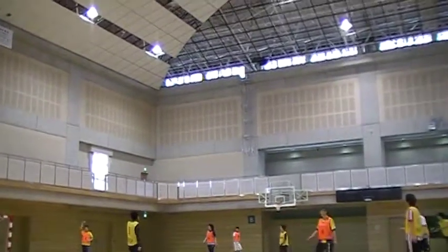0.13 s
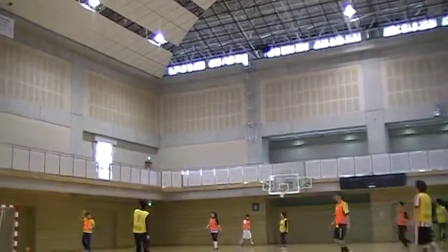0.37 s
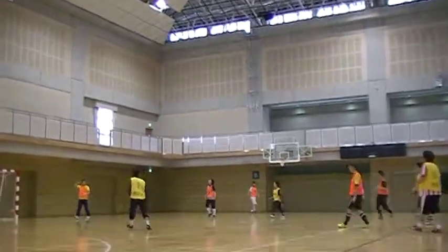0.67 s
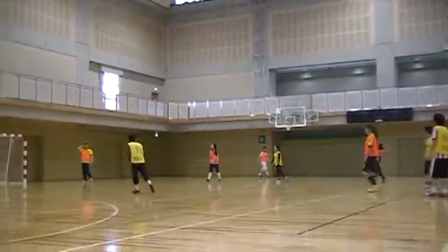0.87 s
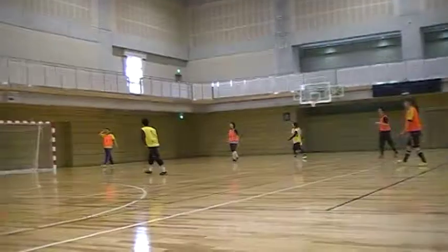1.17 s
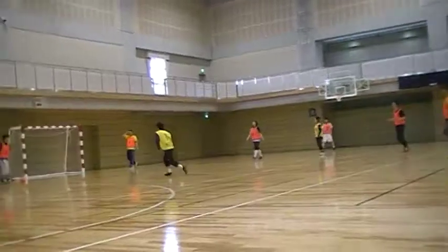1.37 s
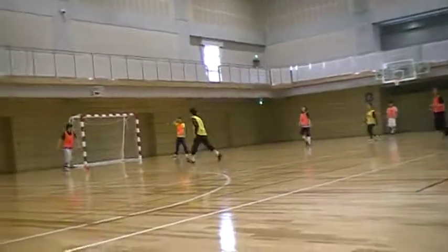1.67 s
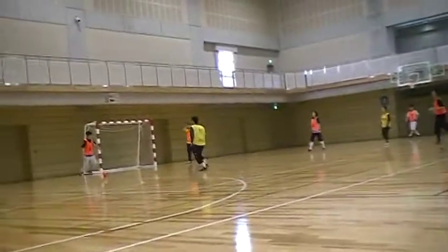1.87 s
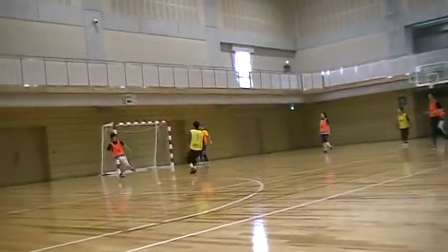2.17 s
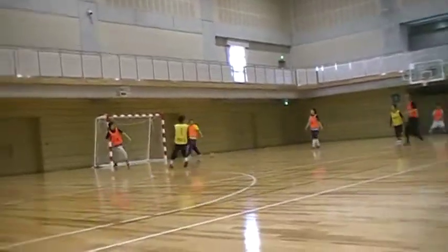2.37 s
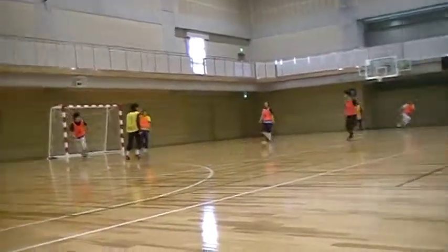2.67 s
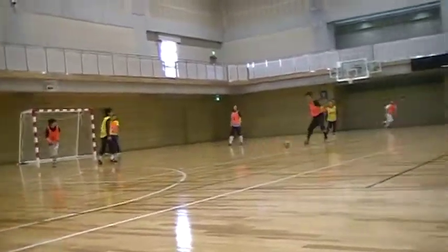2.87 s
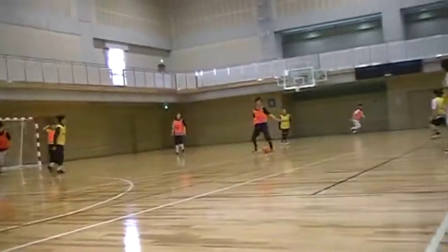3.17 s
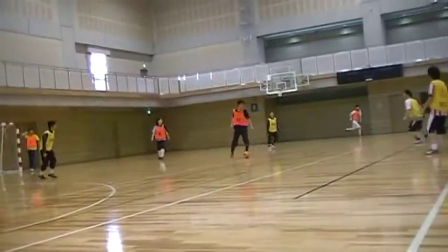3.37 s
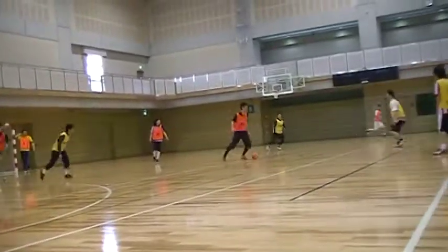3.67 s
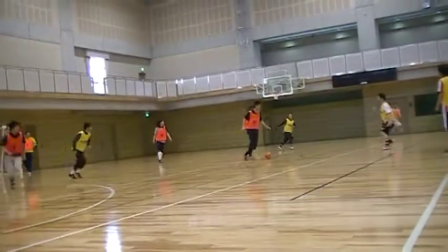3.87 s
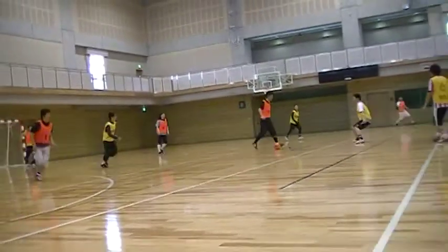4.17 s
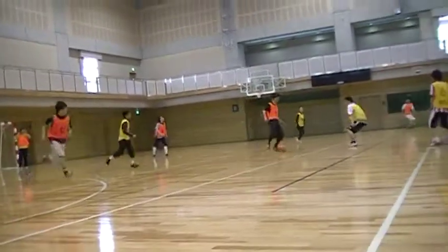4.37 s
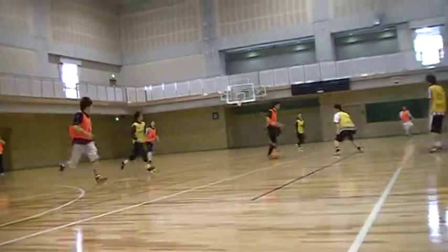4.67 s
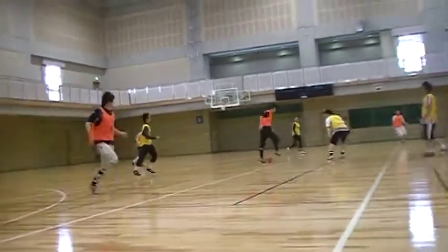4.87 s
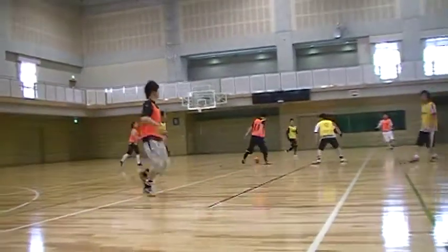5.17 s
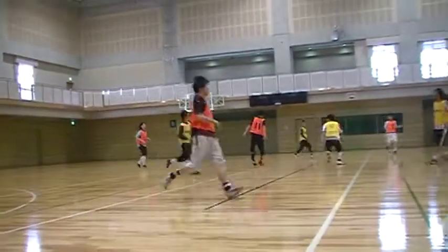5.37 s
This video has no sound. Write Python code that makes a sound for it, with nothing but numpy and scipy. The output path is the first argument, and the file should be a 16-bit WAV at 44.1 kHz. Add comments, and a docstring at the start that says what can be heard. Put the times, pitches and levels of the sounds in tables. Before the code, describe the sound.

Heard from the side line of a big, reverberant gym, an indoor football game makes irregular footfalls and ball knocks on wooden boards. Faint shoe chirps and hissing sole drags come and go over a steady wash of hall noise. After about four seconds the shoes squeal more loudly, and the loudest slaps and kicks land near the end as the background swells.

```python
"""Indoor football in a sports hall

Rubber soles squeal on a wooden floor in short chirps of stick-slip oscillation. Foot slaps and
ball kicks are impacts, and dragged soles hiss with sliding friction. Each sound reaches the side
line directly, then as long reverberation from far walls and roof, over a wash of distant noise."""
import sys
import numpy as np
from scipy import signal
from scipy.fft import rfft, irfft
from scipy.io import wavfile
from scipy.ndimage import uniform_filter1d

SR = 44100
rng = np.random.default_rng(int(sys.argv[2]) if len(sys.argv) > 2 else 0)


def dump(signal):
    """Clip the signal to [-1, 1] and save it as 16-bit WAV at the path in sys.argv[1]."""
    limited = np.clip(np.atleast_2d(signal).T, -1, 1)
    pcm = np.round(limited * 32767).astype(np.int16)
    wavfile.write(sys.argv[1], SR, pcm)


N = 242991


def undb(db):
    """Amplitude ratio of a level in decibels."""
    return 10 ** (np.asarray(db) / 20)


def shape(x, table, power=1):
    """Zero-phase filtering by a (frequency [Hz], gain [dB]) curve, its decibels scaled by power."""
    hz, db = np.transpose(table)
    bins = np.arange(x.shape[-1] // 2 + 1) * SR / x.shape[-1]
    gain = undb(power * np.interp(np.log(bins + 1), np.log(hz + 1), db))
    return irfft(rfft(x) * gain, x.shape[-1])


def band(x, lo_hz, hi_hz):
    """Band-pass filtering."""
    sos = signal.butter(2, [lo_hz, min(hi_hz, .45 * SR)], "bandpass", fs=SR, output="sos")
    return signal.sosfilt(sos, x)


def unit(x):
    """Normalisation to unit RMS."""
    return x / np.sqrt(np.mean(x ** 2))


def add(track, x, s):
    """Superposition of x on track from time s."""
    i = max(int(s * SR), 0)
    track[..., i:i + x.shape[-1]] += x[..., :N - i]


def rumble(level_db=-72):
    """Vibration of the building radiates a narrow band of low noise."""
    return undb(level_db) * unit(band(rng.standard_normal(N), 47, 79))


# Spectrum of the distant noise: (frequency [Hz], relative spectral density [dB])
WASH_SPECTRUM = [(15, -48), (25, -59), (87, -0.5), (223, -9.5), (317, 4), (384, 1.5), (714, 3), (2050, -3),
                 (3300, -12), (4500, -14), (7310, -12), (11900, -22), (16000, -67)]
# Its envelope: (time [s], level [dB])
WASH_ENVELOPE = [(0, -44.5), (.8, -47), (1.698, -51.5), (2.599, -47.5), (3.7, -43.5), (4.598, -42.5),
                 (5.51, -37.5)]
def wash():
    """Far feet and air handling sum incoherently to diffuse noise; rows are mid and side."""
    s, db = np.transpose(WASH_ENVELOPE)
    noise = shape(rng.standard_normal((2, N)), WASH_SPECTRUM)
    return noise / np.std(noise[0]) * undb(np.interp(np.arange(N) / SR, s, db))


def patter(steps_per_s=50):
    """Shot noise: small steps all over the court fall at random times with random strengths."""
    timing, strength, grain = rng.random((3, N))
    impulses = (timing < steps_per_s / SR) * undb(-40.5 - 1.03 * np.log(strength + 1e-9))
    burst = 4 * (grain[:200] - .5) * np.exp(-np.arange(200) / 50)
    return band(signal.fftconvolve(impulses, burst)[:N], 330, 5900)


# Decay of the hall by band: (frequency [Hz], reverberation time [s], relative level [dB])
HALL_BANDS = [(95, 2.1, 5.5), (248, 2.4, 5), (556, 1.8, 7), (1338, 2.12, 7.5), (2430, 2.4, 6),
              (4400, 2.22, 3.5), (8240, 1.68, 3.5), (12100, 0.21, -12), (14900, 0.19, -27)]
def hall(x, gain_db=-7, build_s=0.014):
    """Reverberation: wall echoes thicken and are absorbed, treble first; rows are mid and side."""
    t = np.arange(2 * SR) / SR
    arrives = rng.random(2 * SR) < np.clip((t / .35) ** 2, .005, 1)  # echo density grows as time squared
    echoes = rng.standard_normal((2, 2 * SR)) * arrives
    echoes /= np.sqrt(uniform_filter1d(echoes[0] ** 2, size=800) + 1e-9)
    log_hz = np.log(np.array(HALL_BANDS)[:, 0])
    log_bins = np.log(np.arange(SR + 1) / 2 + 1)
    # overlapping bands sum to unity, each with its own decay
    shares = [np.interp(log_bins, log_hz, row) for row in np.eye(len(log_hz))]
    response = sum(undb(db - 60 * t / t60) * irfft(rfft(echoes) * share)
                   for (_, t60, db), share in zip(HALL_BANDS, shares))
    response *= 1 - np.exp(-(t / build_s) ** 2)
    response *= undb(gain_db) / np.sqrt(np.sum(response[0] ** 2))
    return signal.fftconvolve(x[None], response, axes=1)[:, :N]


def early_reflections(x, gain_db=-9, t60_s=0.05):
    """Scattering by floor, near wall and players trails the direct sound; rows are mid and side."""
    t = np.arange(6000) / SR
    response = rng.standard_normal((2, 6000)) * undb(-60 * t / t60_s) * (t > .002)
    response *= undb(gain_db) / np.sqrt(np.sum(response[0] ** 2))
    return signal.fftconvolve(x[None], response, axes=1)[:, :N]


# Dragged soles:
# (centre time [s], half-length [ms], centre frequency [Hz], bandwidth [Hz], level at centre [dB])
SOLE_DRAGS = [(.38, 61, 1060, 1890, -36), (1.83, 77, 3830, 5540, -43.5), (2.287, 168, 6100, 3730, -40),
              (2.818, 10.5, 5960, 8800, -32), (3.252, 24, 8300, 3870, -42), (3.552, 260, 7700, 3190, -49.5),
              (4.0, 22, 890, 1240, -32.5), (4.021, 20.5, 7640, 7000, -31), (4.232, 130, 7330, 2420, -33.5),
              (4.235, 84, 7100, 10900, -31.5), (4.929, 8.1, 8000, 8350, -25.5), (4.96, 30, 9000, 7100, -33)]
def scuffs(direct, to_hall, hall_db=-1):
    """Sliding friction without grip makes a gritty hiss that swells and fades."""
    for s, half_ms, hz, width_hz, db in SOLE_DRAGS:
        n = int(2 * half_ms * SR / 1000)
        noise = rng.standard_normal(24000)[:n]
        grit = undb(rng.standard_normal(600).repeat(40)[:n])
        hiss = unit(band(noise * grit, max(hz - width_hz / 2, 100), hz + width_hz / 2))
        x = undb(db) * hiss * np.hanning(n) ** 2
        add(direct, x, s - half_ms / 1000)
        add(to_hall, undb(hall_db) * x, s - half_ms / 1000)


def knock(slap_db, thud_db, tick_db, contact_ms):
    """Impact excitation: the sole slaps, grit ticks, and the boards thud and boom on."""
    t = np.arange(2000) / SR
    contact_s = np.clip(contact_ms, .2, 15) / 1000
    noise = rng.standard_normal((2, 2000))
    contact = noise[0] * np.abs(noise[1]) * np.exp(-(t / contact_s) ** 2)
    contact[0] += 3.0  # initial impulse
    boards = contact + 0.48 * noise[1] * np.exp(-t / (5.7 * contact_s))
    # neighbouring bands alternate in sign so that they do not cancel where they meet
    slap = band(contact, 1340, 3090)
    tick = -band(contact, 3100, 11600)
    thud = -band(boards, 450, 1203)
    boom = band(band(boards, 114, 440), 114, 440)
    # energy scales with contact plus ring time: (signal, level re slap [dB], ring time [s])
    parts = (slap, 0, 0), (thud, thud_db, .0056), (tick, tick_db, .0071), (boom, thud_db - 11, .0096)
    return sum(undb(slap_db + db) * x * np.sqrt(0.29 * (contact_s + ring_s) * SR / np.sum(x ** 2))
               for x, db, ring_s in parts)


# Foot slaps, kicks and their first wall echoes:
# (time [s], slap level [dB], thud re slap [dB], tick re slap [dB])
IMPACTS = [(0.3203, -32.5, -1.5, 0.5), (0.3309, -31, 2, 3), (0.3948, -29.5, -1.5, -4),
           (0.5816, -32, -3.5, -12.5), (0.6471, -26.5, -13, -11), (0.8069, -26.5, -19, -12),
           (0.836, -34.5, -8, -13), (0.9607, -29, -11, -21), (1.0089, -32.5, -8, -12),
           (1.0305, -39.5, 0, -16), (1.1457, -33.5, -20, -4), (1.1631, -24, -8.5, -15.5),
           (1.178, -29.5, -7.5, -18), (1.1902, -34.5, 0, -20), (1.4798, -39.5, 1, -16),
           (1.798, -40.5, -2, 4), (1.8262, -30, -2.5, -15), (1.8932, -35, -13, -10.5),
           (2.145, -25.5, 4.5, 5), (2.1616, -30.5, 2.5, 2), (2.1791, -22.5, -2.5, -6),
           (2.1901, -30.5, -20, 1.5), (2.2648, -27, 0.5, -16), (2.268, -30, -6, -4), (2.3084, -38, -14, -5),
           (2.4932, -31.5, -1.5, -1), (2.6258, -29.5, -14.5, -7), (2.8641, -19.5, -3.5, -26),
           (2.877, -39, -21, 6), (2.891, -37, 3, 4.5), (2.923, -20, -10, -5), (3.0582, -33, -0.5, 1.5),
           (3.124, -30, -1.5, -8), (3.1549, -32.5, 3.5, -3.5), (3.484, -38, -10, 1), (3.541, -32, -12, -11),
           (3.5683, -30, -6.5, -20), (3.6539, -38, 2, -12), (3.854, -21.5, -9, -4), (3.905, -34, -2, -14),
           (3.977, -36.5, 9, -3), (4.0723, -31.5, -3, -7), (4.1135, -25, -5.5, -12),
           (4.14, -26.5, -21, -6.5), (4.4457, -33, -2.5, -24), (4.6405, -29, -0.5, -20),
           (4.722, -27, -3.5, -26), (4.742, -25.5, -2, -7), (4.7603, -25.5, -1.5, -6),
           (4.7645, -14.5, -10, -3), (4.8616, -25, -19, -8), (5.0422, -32.5, 7.5, -5),
           (5.0848, -28, 5, -25), (5.0975, -7.5, -8.5, -10.5), (5.1191, -31, 10, -7),
           (5.25, -22.5, -8, -18), (5.3988, -42.5, 12.5, -14), (5.4193, -11.5, -9, -9),
           (5.4202, -9.5, -11.5, -6.5), (5.445, -38, 9, -25), (5.4882, -31.5, 11, -12),
           (5.498, -32, 4, -26)]
def knocks(direct, to_hall, reference_db=-29.5):
    """Contact time shortens with force, and loud, near blows have a smaller reverberant share."""
    for s, slap_db, thud_db, tick_db in IMPACTS:
        force_db = slap_db - reference_db
        x = knock(slap_db, thud_db, tick_db, contact_ms=1.82 - 0.05 * force_db)
        add(direct, x, s)
        add(to_hall, undb(3 - 0.38 * force_db) * x, s)


def squeak(ms, start_hz, end_hz, roughness):
    """Stick-slip oscillation: the sole slips once a cycle; roughness adds waver and harmonics."""
    n = int(ms * SR / 1000)
    progress = np.arange(n) / n
    waver = np.sqrt(30) * uniform_filter1d(rng.standard_normal((2, 2000)), size=30)[:, :n]
    glide_hz = start_hz + (end_hz - start_hz) * progress
    phase = 2 * np.pi * np.cumsum(glide_hz * (1 + 0.045 * roughness * waver[0])) / SR
    octaves_up = max(np.log2((start_hz + end_hz) / 2 / 3700), 0)
    overtone_db = -23 + 30.5 * roughness - 20 * octaves_up  # high squeaks are purer
    tone = np.sin(phase)
    for k in range(2, int(16000 / start_hz) + 1):
        tone += undb(overtone_db - 10 * (k - 2)) * np.sin(k * phase)
    grip = np.minimum(progress / .25, 1) * np.minimum((1 - progress) / .3, 1)
    return np.sqrt(2) * tone * grip * undb(2 * roughness * waver[1])


# Squealing soles and their clearest wall echoes: (time [s], duration [ms], start frequency [Hz],
# end frequency [Hz], level [dB], roughness [clipped to 0-1], gain into the hall [dB])
SOLE_SQUEAKS = [(.019, 6.8, 6400, 5370, -35, 0.15, 11.5), (.062, 5, 6500, 5760, -31.5, 0.68, 7.5),
                (.076, 25, 6240, 5960, -33, 0.65, -10), (.092, 8.1, 6110, 5800, -36, 0.15, 2),
                (.241, 3.2, 2650, 2280, -32.5, 0.25, 5), (.260, 9.5, 1588, 1570, -42.5, 0.72, 2),
                (.311, 5.3, 6170, 5730, -25, 0.48, 4), (.371, 6.5, 3880, 3400, -31, 0.47, -16),
                (.385, 3, 6040, 5870, -29.5, 0.3, -20), (.387, 2.8, 3790, 3340, -30, 0.65, 5),
                (1.143, 7.5, 7440, 7140, -29.5, 0.25, 6), (1.158, 6, 5250, 5180, -38, .3, 12.5),
                (1.189, 19, 7360, 7100, -36.5, 0.4, -2), (1.199, 28, 5120, 5160, -39, 0.3, -12),
                (1.226, 37, 7260, 7200, -38, 0, -17), (1.775, 6.3, 6260, 5530, -46.5, .5, 12),
                (2.088, 3.9, 8300, 8000, -41, 1.1, -6), (2.814, 6.6, 1710, 1970, -33, 0.64, 8),
                (2.850, 32, 3255, 3720, -46, 0.9, 2), (2.900, 34, 3750, 3400, -41, 0.56, -1),
                (2.943, 4.3, 3330, 3150, -30, 0.1, 7.5), (3.004, 7.6, 3570, 3410, -31, 0.27, 6),
                (3.05, 25, 4670, 4840, -47.5, 0.1, 11.5), (3.082, 24, 3520, 3345, -37, 0.35, 4),
                (4.015, 10.2, 4230, 3405, -19, 0.62, -3.5), (4.025, 7.8, 3710, 3060, -24, 0.66, -1),
                (4.548, 23.4, 3444, 3716, -16, 0.12, -6.5), (4.568, 7.1, 3714, 3700, -26, 0.61, 4),
                (4.582, 7, 4940, 4430, -32.5, 0.7, -17), (4.594, 8.9, 7800, 7400, -32, .2, -15),
                (4.602, 3.7, 4140, 4000, -34, 1.1, -10), (4.625, 10, 3680, 3600, -28.5, 0, 3),
                (4.635, 13, 3500, 3824, -22, 0.13, 7.5), (4.654, 4.8, 3970, 4000, -23, 0, -1),
                (4.918, 7.6, 7920, 5720, -25.5, 0.44, 3), (4.925, 8.6, 5200, 6100, -27.5, 0.3, -5),
                (4.933, 23.5, 3520, 3438, -20, 0.27, -0.5), (4.955, 11, 3520, 3620, -23.5, 0.42, 5),
                (4.958, 14, 6070, 5400, -33.5, 0.4, 3)]
def squeaks(direct, to_hall):
    """Uneven radiation towards the walls modulates a rough squeal and so widens its tail's spectrum."""
    uneven = unit(uniform_filter1d(rng.standard_normal(N), size=60))
    for s, ms, start_hz, end_hz, db, roughness, hall_db in SOLE_SQUEAKS:
        roughness = np.clip(roughness, 0, 1)
        x = undb(db) * squeak(ms, start_hz, end_hz, roughness)
        modulation = 1 + 1.72 * roughness * uneven[int(s * SR):][:len(x)]
        add(direct, x, s)
        add(to_hall, undb(hall_db) * x * modulation, s)


# Width of the diffuse field: (frequency [Hz], side re mid [dB])
DIFFUSE_WIDTH = [(50, -11), (500, -13.5), (2000, -9.5), (6000, -8.5), (9500, -3.5), (15000, -23)]
def scene():
    """Direct sound in the centre and the diffuse field superpose; rows are left and right."""
    direct, to_hall = np.zeros((2, N))
    squeaks(direct, to_hall)
    knocks(direct, to_hall)
    scuffs(direct, to_hall)
    steps = patter()
    mid, side = hall(to_hall + steps) + early_reflections(direct + steps) + wash()
    side = shape(side, DIFFUSE_WIDTH)
    return direct + steps + np.array([mid + side, mid - side]) + rumble()


# Balance of the microphone ports: (frequency [Hz], left re right [dB])
PORT_BALANCE = [(60, 4.5), (110, 5.5), (200, 3), (380, 4), (700, 1), (1290, 1.5), (2380, 1.0), (4400, 0.5),
                (8120, 0.5), (15000, 1)]
# Phase between the ports: (frequency [Hz], lead of the left [rad])
PORT_PHASE = [(0, 0), (260, -.2), (1500, 0), (7000, .2), (9300, 1.3), (16000, .8)]
def record(dry, rolloff_hz=8200, cutoff_hz=16000):
    """Transduction: two ports differ in gain and phase; the capsules lose treble and add hiss."""
    left = shape(dry[0], PORT_BALANCE, power=.5)
    right = shape(dry[1], PORT_BALANCE, power=-.5)
    hz, radians = np.transpose(PORT_PHASE)
    lead = np.interp(np.arange(N // 2 + 1) * SR / N, hz, radians)
    left = irfft(rfft(left) * np.exp(1j * lead), N)
    pair = signal.sosfilt(signal.butter(3, rolloff_hz, fs=SR, output="sos"), [left, right])
    hiss = undb(-65) * band(rng.standard_normal((2, N)), 7000, 12400)
    return signal.sosfilt(signal.ellip(10, .2, 80, cutoff_hz, fs=SR, output="sos"), pair + hiss)


dry = scene()
out = record(dry)
dump(out)
```